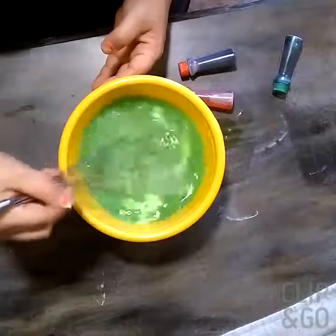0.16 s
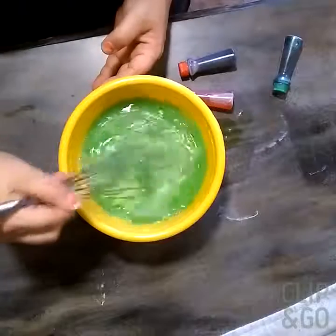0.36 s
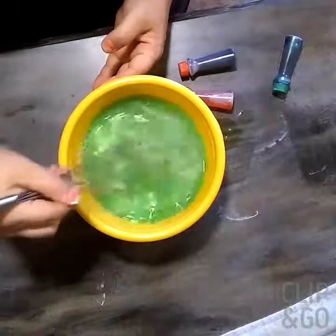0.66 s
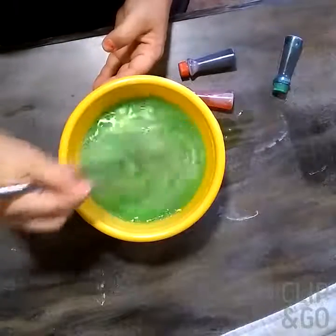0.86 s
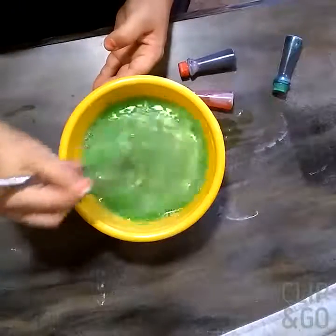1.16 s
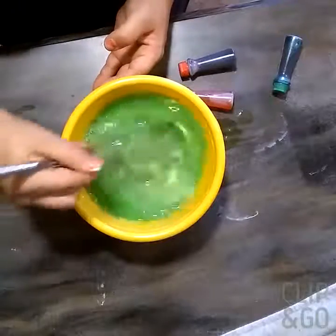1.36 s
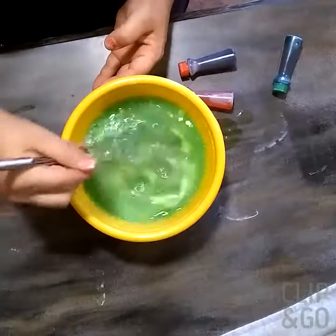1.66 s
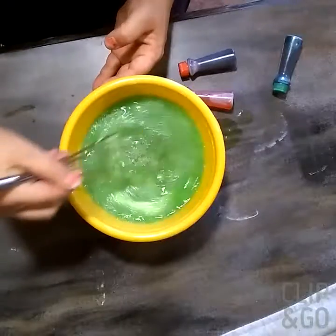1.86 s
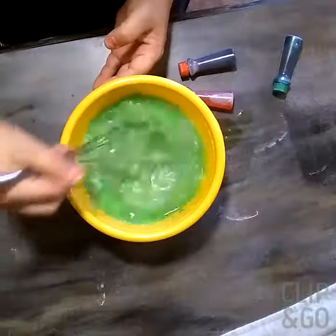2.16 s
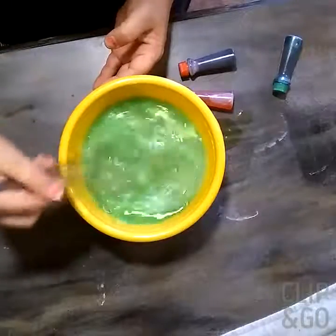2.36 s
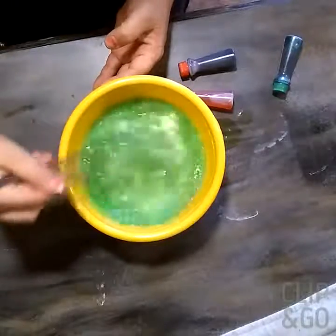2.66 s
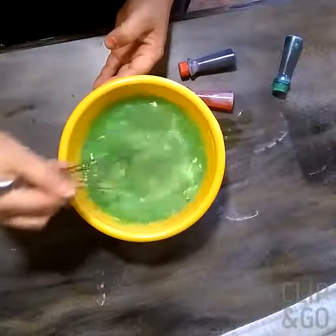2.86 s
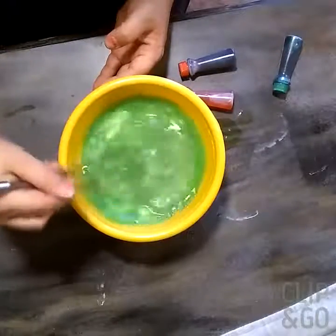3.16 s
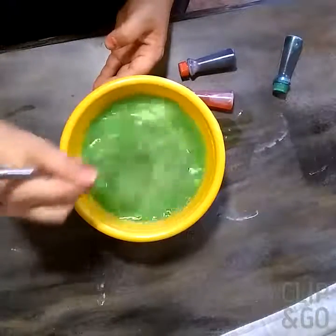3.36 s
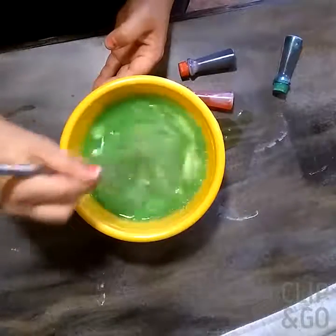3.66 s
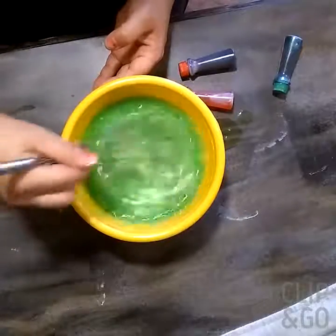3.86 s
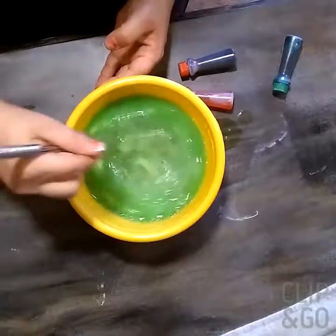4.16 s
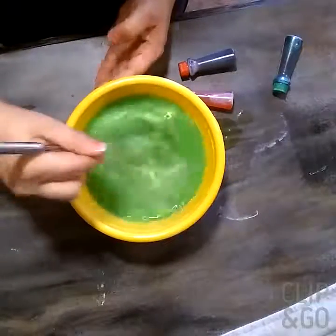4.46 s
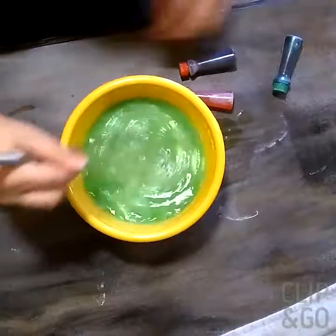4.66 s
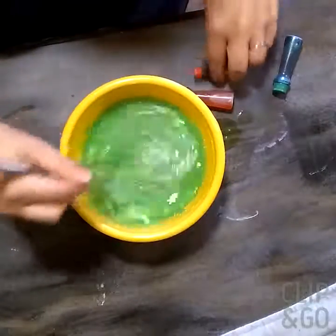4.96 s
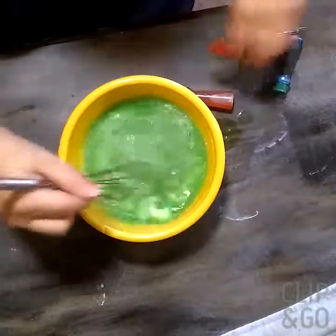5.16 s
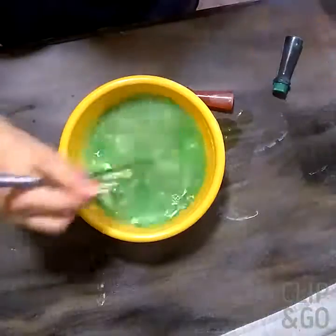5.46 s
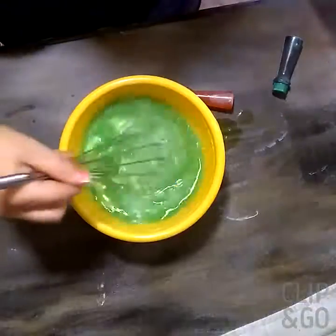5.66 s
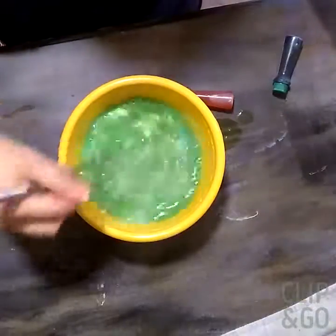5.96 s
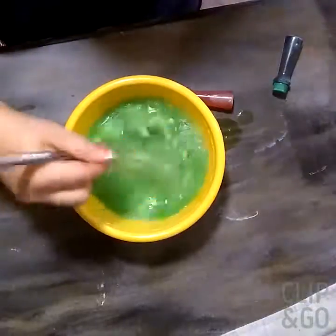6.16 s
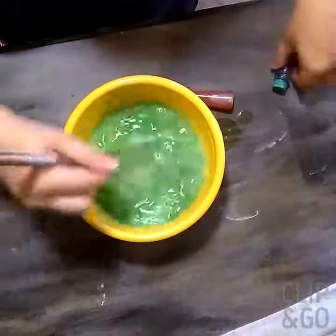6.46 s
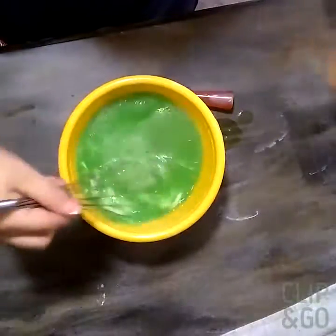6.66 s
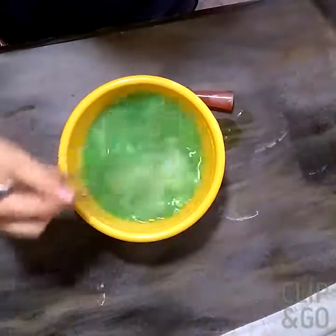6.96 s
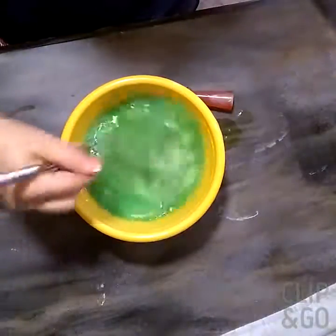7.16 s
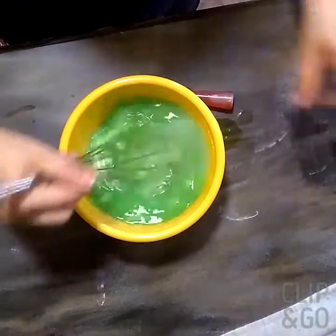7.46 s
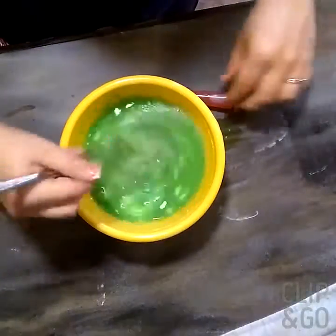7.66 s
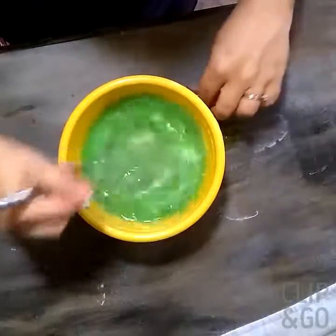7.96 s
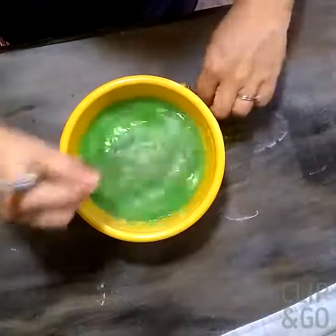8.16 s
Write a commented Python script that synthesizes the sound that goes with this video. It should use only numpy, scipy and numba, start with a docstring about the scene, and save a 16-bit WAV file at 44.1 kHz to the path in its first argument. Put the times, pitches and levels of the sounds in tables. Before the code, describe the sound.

Close, brisk whisking in a plastic bowl: wet metallic swishing and clicking, small gurgles, dull bowl knocks and low table thumps in a small room.

```python
"""Small room: a wire whisk beats thin batter in a plastic bowl on a table, close under a two-port phone.
Wires chatter, tick and tap on the wall as filtered grit, noise bursts and damped modes, and snap as pings;
knocks ring the bowl's modes, the table thumps in damped sines and rumbles in low grit; batter sloshes as
filtered grit, with bubbles and droplets as rising tones; a noise-tail room and a faint hush surround it."""
import sys
import numpy as np
from scipy import signal
from scipy.fft import rfft, irfft, next_fast_len
from scipy.io import wavfile
from scipy.ndimage import uniform_filter1d
from numba import njit

SR = 44100
rng = np.random.default_rng(int(sys.argv[2]) if len(sys.argv) > 2 else 0)


def output_pcm(signal):
    """Save a mono or channel-first signal as 16-bit PCM at the path in sys.argv[1].

    Samples are clipped to [-1, 1] before scaling.
    """
    pcm = np.clip(np.atleast_2d(signal).T, -1, 1) * 32767
    wavfile.write(sys.argv[1], SR, np.round(pcm).astype(np.int16))


N = 366471
SIZE = next_fast_len(N + SR)
HZ = np.maximum(np.fft.rfftfreq(SIZE, 1 / SR), 1)
TIME = np.arange(N) / SR

# Whole-bowl knocks. Each row: time in s, level in dB, most favoured pitch in Hz, hardness 0-1.
BOWL_KNOCKS = [(0.016, -36, 267, 0.34), (0.167, -30.5, 566, 0.36), (0.188, -23.5, 280, 0.5),
               (0.221, -34, 265, 0.2), (0.273, -31, 414, 0.24), (0.344, -33.5, 626, 0.8),
               (0.425, -35.5, 441, 0.64), (0.491, -37, 262, 0.06), (0.741, -34.5, 260, 0),
               (0.85, -36.5, 239, 0.1), (0.953, -34.5, 633, 0.4), (0.9887, -23, 573, 0.82),
               (0.997, -30, 273, 0), (1.131, -35, 244, 0.3), (1.232, -35.5, 236, 0.6),
               (1.293, -39, 258, 0.3), (1.39, -35.5, 199, 0.1), (1.558, -40, 363, 0.6),
               (1.636, -37, 596, 0.5), (1.679, -34, 245, 0.54), (1.827, -28, 608, 0.2),
               (1.84, -19, 279, 0.34), (2.051, -39, 619, 0.86), (2.0926, -23, 282, 0.64),
               (2.214, -39, 237, 0.4), (2.331, -32, 660, 0.28), (2.629, -41, 205, 0.1),
               (2.733, -32, 233, 0.16), (2.907, -32, 249, 0.57), (3.082, -44, 620, 0.4),
               (3.215, -36, 256, 0.34), (3.26, -34, 380, 0), (3.42, -34.5, 228, 0.6),
               (3.837, -35, 243, 0.5), (4.0077, -25, 640, 0.28), (4.126, -34, 285, 0.3),
               (4.576, -26, 237, 0.09), (4.597, -36.5, 239, 0), (4.791, -35.5, 202, 0.1),
               (4.998, -23.5, 520, 0.36), (5.018, -29, 272, 0.12), (5.552, -34, 199, 0.6),
               (5.5993, -21.5, 404, 0.63), (5.605, -15, 249, 0.18), (6.47, -35.5, 270, 0.2),
               (6.784, -31, 276, 0.2), (6.803, -31.5, 500, 0.3), (6.82, -36, 300, .15),
               (6.9485, -15.5, 249, 0.39), (7.025, -35, 300, 0), (7.06, -39.5, 270, .1),
               (7.367, -35, 170, 0.1), (7.477, -39, 275, 0), (7.525, -31.5, 385, 0.35),
               (7.575, -36.5, 369, 0.56), (7.787, -25.5, 590, 0.35), (7.793, -24, 343, 0),
               (8.008, -18.5, 544, 0.17), (8.209, -22, 560, 0.57)]
# Table thumps. Each row: time in s, level in dB, pitch in Hz, t60 in s.
TABLE_THUMPS = [(0.27, -41, 108, 0.3), (2.718, -36.5, 115, 0.22), (4.562, -39, 127.4, 0.28),
                (5.204, -40.5, 111, 0.17), (5.52, -34, 77.6, 0.2), (6.158, -43, 77, 0.29),
                (6.235, -45, 79, 0.29), (6.468, -26, 79, 0.29), (6.534, -33.5, 88.6, 0.45),
                (6.775, -30, 129, 0.12), (7.072, -38, 109, 0.18), (7.365, -31, 100.5, 0.25),
                (7.4, -31.5, 94.3, 0.28), (7.68, -39, 62.4, 0.56), (7.966, -38, 62, 0.22),
                (8.258, -29.5, 88, 0.31)]
# Modes of the bowl's upper wall. Each row: nominal pitch in Hz, relative level in dB, nominal t60 in s.
WALL_MODES = [(713, -12, 0.042), (792, 0, 0.085), (927, 2, 0.041), (1127, -5, 0.11), (1260, -18, 0.19),
              (1394, -8.5, 0.082), (1653, -1, 0.057), (1776, -0.5, 0.021), (2082, 0, 0.033),
              (3370, -35, 0.021), (3790, -5, 0.032)]
# Modes of the filled bowl on the table. Each row: nominal pitch in Hz, relative level in dB, nominal t60 in s.
BELLY_MODES = [(168.4, -3, 0.162), (207.3, -1.5, 0.16), (259.4, -4, 0.16), (284, 2.5, 0.073),
               (363.4, -6, 0.14), (442, -2.5, 0.12), (498, -8, 0.15), (577, 4.5, 0.048), (639, 2.5, 0.093),
               (804, -1, 0.08), (884, -8.5, 0.22), (1080, -15, 0.079)]
# Colour of a wire contact. Each row: frequency in Hz, relative gain in dB.
CONTACT_COLOUR = [(1200, -17.5), (1800, -10), (2300, -15), (2800, -6), (3300, -5), (3950, -11.5),
                  (4650, -3), (5800, -11), (7000, -9), (7700, -11.5), (8700, -8), (10800, -13.5),
                  (12000, -14.5), (13200, -16.5), (15500, -22.5)]
# Steady stirring. Each row: time in s, then levels in dB of wall rub, slosh and table rumble.
STIRRING = [(0, -46.5, -47, -45), (.45, -40.5, -69, -63.5), (.8, -46.5, -46, -51), (1.3, -41.5, -54, -55),
            (1.7, -41, -48, -51.5), (2.25, -40.5, -48.5, -56.5), (2.55, -52, -55, -50),
            (2.9, -46.5, -43, -52), (3.3, -49, -60, -49), (3.7, -60, -54.5, -53.5), (4.15, -48, -51.5, -46),
            (4.7, -68, -52, -56), (5.2, -63.5, -54.5, -48), (6.1, -52, -51.5, -50), (6.55, -65, -46.5, -53),
            (6.73, -56, -48.5, -46), (7.05, -60, -44.5, -47), (7.17, -67, -50, -56), (7.4, -48, -46.5, -50),
            (8.31, -44.5, -42.5, -54)]

BLOW_SCATTER_DB = 2.0
DETUNE = .025  # moving batter and place of the blow shift each mode by this share (spread)


def undb(db):
    """Decibels to gain."""
    return 10 ** (np.asarray(db) / 20)


def unit(x):
    """Scale to rms 1."""
    return x / np.sqrt(np.mean(x ** 2))


def together(levels_db):
    """Sum of powers, in dB."""
    return 10 * np.log10(np.sum(undb(levels_db) ** 2, axis=0))


def across(table):
    """Read (Hz, value) points at every frequency, on a log axis."""
    hz, value = np.transpose(table)
    return np.interp(np.log(HZ), np.log(hz), value)


def along(table):
    """Read every column of a time curve at every sample."""
    s, *columns = np.transpose(table)
    return [np.interp(TIME, s, column) for column in columns]


def walk(rate_hz):
    """Random levels, held 1 / rate_hz s and slewed twice; rms 1."""
    hold = int(SR / rate_hz)
    steps = np.repeat(rng.standard_normal(N // hold + 1), hold)
    return unit(uniform_filter1d(uniform_filter1d(steps, hold), hold)[:N])


def grit(rate_hz, spread_db):
    """Random contacts, rate_hz a second, most small and a few large; rms 1."""
    hit = rng.random(N) < rate_hz / SR
    force = rng.standard_normal(N) * undb(spread_db * rng.exponential(size=N))
    return unit(hit * force)


def band(x, hz, octaves):
    """Band-pass around hz."""
    edges_hz = np.clip(hz * 2 ** np.array([-octaves / 2, octaves / 2]), 20, .45 * SR)
    return signal.sosfilt(signal.butter(2, edges_hz, "bandpass", fs=SR, output="sos"), x)


def between(x, low_hz, high_hz):
    """Steep band-pass."""
    return signal.sosfilt(signal.butter(3, [low_hz, high_hz], "bandpass", fs=SR, output="sos"), x)


def colour(x, table):
    """Causal minimum-phase filter with the table's gain, scaled to pass white noise at the same rms."""
    hz, db = np.transpose(table)
    grid_hz = np.linspace(1, SR / 2, 2049)
    log_gain = np.interp(np.log(grid_hz), np.log(hz), db) * np.log(10) / 20
    cepstrum = irfft(log_gain)
    cepstrum[1:2048] *= 2  # fold onto positive time
    cepstrum[2049:] = 0
    kernel = irfft(np.exp(rfft(cepstrum)))
    return signal.fftconvolve(x, kernel / np.sqrt(np.sum(kernel ** 2)))[:N]


def ring(x, hz, t60_s):
    """One damped mode driven by x."""
    p = np.exp(2j * np.pi * hz / SR - np.log(1000) / (t60_s * SR))
    return signal.lfilter([0, p.imag], [1, -2 * p.real, abs(p) ** 2], x)


@njit
def grains(start, size, hz, glide, t60, attack):
    """Short damped tones that may glide up, each with a quick swell."""
    out = np.zeros(N + SR)
    for k in range(len(start)):
        z = size[k] + 0j
        p = np.exp(2j * np.pi * hz[k] / SR - np.log(1000) / (t60[k] * SR))
        turn = np.exp(4j * np.pi * hz[k] * glide[k] / SR ** 2)
        gap, close = 1., np.exp(-1 / (attack[k] * SR))
        for i in range(start[k], start[k] + min(int(t60[k] * SR), SR)):
            out[i] += z.imag * (1 - gap)
            z, p, gap = z * p, p * turn, gap * close
    return out[:N]


def blips(s, db, hz, glide, t60_s, attack_s=0.00054):
    """Short damped tones; a positive glide raises the pitch, as of an air pocket nearing the surface."""
    start = (s * SR).astype(np.int64)
    return grains(start, undb(db), hz, glide, t60_s, np.full(len(s), attack_s))


def strike(s, size, modes, scatter_db, near_hz=None, favour_db=0., swell_turns=.01):
    """Blows land at different spots: each shares its force anew and finds the modes a little shifted."""
    hz, db, t60_s = np.transpose(modes)
    share, shift, damp = rng.standard_normal((3, len(s), len(modes)))
    favour = 0
    if near_hz is not None:
        favour = favour_db * np.exp(-(np.log2(hz / near_hz[:, None]) / 0.24) ** 2)
    sign = (-1) ** np.arange(len(modes))
    gain = size[:, None] * undb(db + favour + scatter_db * share) * sign
    start = np.repeat(np.clip((s * SR).astype(np.int64), 0, N - 1), len(modes))
    mode_hz = (hz * (1 + DETUNE * shift)).ravel()
    mode_t60_s = (t60_s * undb(1.9 * damp)).ravel()
    attack_s = np.tile(swell_turns / hz, len(s))
    return grains(start, gain.ravel(), mode_hz, np.zeros(len(start)), mode_t60_s, attack_s)


def faint(level_db, low_hz, high_hz, count):
    """Random rows (s, dB, Hz) that follow a level curve."""
    when, loud, size = rng.random((count, 3)).T
    s = when * TIME[-1]
    db = np.interp(s, TIME, level_db) + 3.4 * (loud - 1)
    return np.transpose([s, db, low_hz * (high_hz / low_hz) ** size])


def dying(table, offset_db, t60_s):
    """A level in dB that jumps at each event of the table and dies away."""
    s, db = np.transpose(table)[:2]
    push = np.zeros(N)
    np.add.at(push, (s * SR).astype(int), undb(db + offset_db))
    return 20 * np.log10(signal.lfilter([1], [1, -undb(-60 / (t60_s * SR))], push) + 1e-9)


def strokes():
    """Each stroke swells, holds and fades; brightness is the power-weighted mean of what sounds."""
    # Each row: start of the hold in s, hold in s, chatter level in dB, brightness in dB per octave.
    stroke_rows = [(0.025, 0.0036, -37, 0.5), (0.18, 0.031, -37, -4), (0.302, 0.05, -38.5, 1),
                   (0.439, 0.029, -37, -5), (0.525, 0.098, -52, 0), (0.68, 0.053, -39.5, -3),
                   (0.87, 0.036, -39.5, -2.5), (0.962, 0.046, -31.5, -2), (1.087, 0.13, -42.5, -0.2),
                   (1.24, 0.062, -32.5, -3), (1.395, 0.001, -47.5, -14), (1.497, 0.095, -39.5, -4.5),
                   (1.643, 0.052, -40.5, -4), (1.724, 0.081, -43.5, -8.5), (1.849, 0.0025, -31, -4.5),
                   (1.943, 0.068, -39.5, -2.5), (2.045, 0.068, -34.5, -3), (2.25, 0.052, -37.5, -0.5),
                   (2.374, 0.018, -35, -2.5), (2.53, 0.044, -39.5, 1.5), (2.659, 0.071, -39, -3),
                   (2.81, 0.047, -38, 4.5), (2.915, 0.024, -36.5, -1.5), (3.068, 0.035, -38.5, 4.5),
                   (3.221, 0.014, -34, -0.7), (3.359, 0.062, -42, 4.5), (3.496, 0.04, -46.5, 4.5),
                   (3.662, 0.079, -46.5, 0), (3.807, 0.031, -50, 5), (3.928, 0.054, -48.5, 5),
                   (4.011, 0.018, -40.5, -3), (4.074, 0.028, -46, 6.5), (4.146, 0.001, -38.5, 0),
                   (4.244, 0.022, -40, 1.5), (4.32, 0.12, -47, -0.5), (4.535, 0.026, -35.5, 4),
                   (4.67, 0.054, -44, -1), (4.82, 0.036, -41.5, 2), (5.035, 0.029, -50.5, -1.5),
                   (5.323, 0.019, -46, 3.5), (5.46, 0.018, -38.5, 0.5), (5.671, 0.016, -46, -2),
                   (5.77, 0.029, -49, 6.5), (5.898, 0.014, -43, 1.5), (5.99, 0.055, -39, 0),
                   (6.178, 0.014, -43, 2.5), (6.255, 0.055, -53, -1), (6.31, 0.098, -46, 4.5),
                   (6.524, 0.06, -41.5, 2), (6.633, 0.004, -39, -0.5), (7.329, 0.002, -33.5, 2),
                   (7.427, 0.038, -45.5, 3), (7.551, 0.0061, -32, 1), (7.64, 0.061, -45.5, 2.5),
                   (7.772, 0.012, -31.5, 0.5), (7.876, 0.006, -38, -0.5), (8, 0.002, -30.5, -1),
                   (8.11, 0.034, -47, 2), (8.213, 0.054, -40.5, -7)]
    # Chatter between strokes. Each row: time in s, level in dB, brightness in dB per octave.
    lull_rows = [(0, -45, 0), (1.4, -50.5, 6), (2.8, -48, 5.5), (4.15, -69, 2), (5.1, -62.5, 5.5),
                 (5.9, -59, -1), (6.9, -63, 0.5), (8.31, -50.5, -3)]
    rise_db_per_s, fall_db_per_s = 493, 312
    lull_db, lull_tilt_db = along(lull_rows)
    power = undb(lull_db) ** 2
    tilt = power * lull_tilt_db
    for s, hold_s, db, tilt_db in stroke_rows:
        near = slice(max(int((s - .3) * SR), 0), int((s + .5) * SR))
        late_s = TIME[near] - s
        slope_db = np.maximum(-late_s * rise_db_per_s, (late_s - hold_s) * fall_db_per_s)
        swell = undb(db - np.maximum(0, slope_db)) ** 2
        power[near] += swell
        tilt[near] += swell * tilt_db
    return 10 * np.log10(power), tilt / power


def hush():
    """Room hush: steady coloured noise."""
    # Each row: frequency in Hz, relative gain in dB.
    hush_colour = [(24, -49), (45, -38), (106, 0.5), (241, 7), (309, -6), (1680, -14.5), (2510, -17.5),
                   (3300, -12.5), (5000, -30), (7710, -32), (8730, -21.5), (15500, -29)]
    return undb(-51) * colour(rng.standard_normal(N), hush_colour)


def tail(t60_s):
    """A burst of fading reflections with unit energy."""
    t = np.arange(int(t60_s * SR)) / SR
    echoes = rng.standard_normal(len(t)) * undb(-60 * t / t60_s)
    return echoes / np.sqrt(np.sum(echoes ** 2))


def reverb(x):
    """The small room answers after a short gap."""
    gap_s, t60_s, room_db = .006, 0.29, -10.5
    echoes = np.r_[np.zeros(int(gap_s * SR)), tail(t60_s)]
    return undb(room_db) * signal.fftconvolve(x, echoes)[:N]


def shaking():
    """Rumble level: stirring that wavers, and a dying shake after every knock and thump."""
    waver_db, knock_shake_db, thump_shake_db, shake_t60_s = 3, -26.5, -5.5, 0.38
    return together([along(STIRRING)[2] + waver_db * walk(15),
                     dying(BOWL_KNOCKS, knock_shake_db, shake_t60_s),
                     dying(TABLE_THUMPS, thump_shake_db, shake_t60_s)])


def rumble():
    """The rocking bowl rumbles through the table, which shakes the ports partly against each other."""
    # Each row: frequency in Hz, relative gain in dB.
    rumble_colour = [(20, -75), (40, -37), (60, -19.5), (90, -2.5), (130, -2), (180, -13.5), (300, -49)]
    opposed = .2  # share of power that reaches the ports in opposite sign
    shake = undb(shaking())
    common, left, right = (colour(grit(300, 0.77) * shake, rumble_colour) for _ in range(3))
    against = np.sqrt(opposed) * np.array([common, -common])
    separate = np.sqrt(1 - opposed) * np.array([left, right])
    return undb(-6.0) * (against + separate)


def thumps():
    """The table top swings after each jolt, two of its shapes at once; the ports feel it out of step."""
    attack_s, mean_lag_rad, lag_spread_rad = 0.005, 1.7, 0.7
    out, t = np.zeros((2, N + SR)), np.arange(SR // 2) / SR
    lag = mean_lag_rad + lag_spread_rad * rng.standard_normal((len(TABLE_THUMPS), 2, 1, 1))
    phases = np.array([[0], [-1]]) * lag  # thump, shape, port, time
    for (s, db, hz, t60_s), (first, second) in zip(TABLE_THUMPS, phases):
        start = int(s * SR)
        shape = undb(db + 2.0 - 60 * t / t60_s) * (1 - np.exp(-t / attack_s))
        swing = np.sin(2 * np.pi * hz * t + first)
        swing = swing + 0.33 * np.sin(2 * np.pi * 1.394 * hz * t + second)
        out[:, start:start + len(t)] += shape * swing
    return out[:, :N]


def gurgle(rub_db, count=1500):
    """Bubbles beaten into the batter ring and rise in pitch; small ones are higher and shorter."""
    when, size, loud, rise = rng.random((count, 4)).T
    s, hz = when * TIME[-1], 220 * 2 ** (3.163 * size)
    db = np.interp(s, TIME, rub_db) - 4.01 * np.log(1 - loud) - 7.5
    return between(blips(s, db, hz, 10 * rise, np.clip(30 / hz, .005, .08)), 150, 4800)


def batter():
    """Batter slaps wall and belly of the bowl in soft lumps, gurgles, and washes on after each knock."""
    # Each row: frequency in Hz, relative gain in dB.
    slosh_colour = [(100, -30.5), (170, 2), (260, 4), (400, 3.5), (600, -5), (1000, -16.5), (2000, -28)]
    stroke_share = 0.44  # share of the stroke's swell, in dB, that the wall rub follows
    wash_db, wash_t60_s = -17.5, 0.36
    rub_db, slosh_db = along(STIRRING)[:2]
    stroke_db = strokes()[0]
    rub_db = rub_db + stroke_share * (stroke_db - uniform_filter1d(stroke_db, SR // 3))
    slosh_db = together([slosh_db, dying(BOWL_KNOCKS, wash_db, wash_t60_s)])
    # rubbing halves the wall's t60
    wall = sum(undb(db) * ring(grit(1500, 3.1) * undb(rub_db), hz, 0.5 * t60_s)
               for hz, db, t60_s in WALL_MODES)
    lumps = grit(900, 2.1) * undb(slosh_db)
    belly = sum(undb(db) * ring(lumps, hz, t60_s) for hz, db, t60_s in BELLY_MODES)
    slosh = undb(-4.0) * colour(lumps, slosh_colour)
    return gurgle(rub_db) + undb(-31.0) * wall + slosh + undb(-40.5) * belly


def droplets(count=2500):
    """Spray flung off the wires: tiny bright rising blips, louder on strong strokes."""
    when, size, loud, rise = rng.random((count, 4)).T
    s, hz = when * TIME[-1], 2800 * 2 ** (1.9 * size)
    db = np.interp(s, TIME, strokes()[0]) - 4.14 * np.log(1 - loud) - 9
    return blips(s, db, hz, 12 * rise, np.clip(60 / hz, .003, .05))


def knocks():
    """A soft blow reaches only low modes, a hard one more of them behind a firm front; the bowl bounces once."""
    lead_s, front_late_s, bounce_late_s = 0.00052, 0.00147, 0.00783  # first touch leads the listed time
    front_db, front_hz, front_t60_s = 6.5, 611, 0.012
    swell_turns = 1.5  # build-up time constant, in cycles of each mode
    s, db, hz, hard = np.transpose(BOWL_KNOCKS)
    s, hard = s - lead_s, np.clip(hard, .01, 1)

    def blow(at_s, size, favour_db):
        return strike(at_s, size, BELLY_MODES, BLOW_SCATTER_DB, hz, favour_db, swell_turns)

    sharp = blow(s, hard * undb(db - 8.5), 9.3)
    dull = blow(s, (1 - hard) * undb(db - 9.0), 10.6)
    bounce = blow(s + bounce_late_s, undb(db - 18.0), 6.5)
    front = blips(s + front_late_s, db + front_db + 10 * np.log10(hard),
                  front_hz + 0 * s, 0 * s, front_t60_s + 0 * s)
    return between(front, 180, 2500) + between(sharp, 186, 1070) + between(dull + bounce, 141, 540)


def taps():
    """Each tap cracks, rings the wall and squeezes an air pocket in the batter."""
    # Each row: time in s, level in dB, pocket pitch in Hz, pocket share 0-1.
    tap_rows = [(.153, -31, 660, 0.8), (.169, -29, 720, 0.5), (.186, -19.5, 1390, 0.48),
                (.346, -27.5, 760, 0.14), (.428, -35, 960, 0.2), (0.487, -38, 910, 0.8),
                (0.609, -36, 850, 0.27), (.701, -35.5, 900, 0.4), (.842, -35, 780, 0.7),
                (.874, -33, 799, 0.26), (.933, -30, 830, 0.7), (.99, -23.5, 1210, 0.3),
                (1.123, -40, 790, 0.2), (1.161, -27, 814, 0.5), (1.239, -33.5, 880, 0.3),
                (1.297, -34, 980, 0.6), (1.503, -36.5, 1660, 0.7), (1.68, -24.5, 1790, 0.1),
                (1.694, -29, 1490, 0.4), (1.776, -33, 1460, .93), (1.824, -32, 1540, 0.8),
                (1.842, -20, 1136, 0.57), (2.049, -30, 1550, 0.03), (2.094, -22, 1127, 0.65),
                (2.227, -34, 766, 0), (2.341, -33, 980, 0.4), (2.37, -31, 2120, 0.8),
                (2.548, -30.5, 810, 0.16), (2.577, -28.5, 1287, 0.96), (2.658, -34.5, 1780, 1),
                (2.721, -32, 940, 0.16), (2.852, -30, 730, 0.55), (2.864, -25.5, 1090, 0.26),
                (2.92, -25.5, 1070, 0.26), (3.083, -22, 770, 0.24), (3.207, -34, 1060, 0.5),
                (3.224, -24.5, 840, 0.45), (3.404, -32, 840, 0.04), (3.421, -23.5, 870, 0.34),
                (3.437, -27, 1030, 0.26), (3.713, -37, 1120, 0.02), (3.836, -29.5, 865, 0.6),
                (3.931, -26.5, 795, 0.5), (4.013, -21, 873, 0.6), (4.127, -28.5, 1160, 0),
                (4.241, -32, 1960, 0.8), (4.395, -31, 764, 0.4), (4.574, -34.5, 820, 0.33),
                (4.641, -39, 1010, 0.3), (5.045, -37.5, 795, 0.86), (5.341, -32.5, 2017, 1),
                (5.544, -29.5, 810, 0.68), (5.599, -21, 840, 0.9), (5.892, -42.5, 1680, 0.3),
                (6.782, -43, 825, 0.45), (6.81, -36.5, 1160, 0.27), (6.951, -34, 770, 0.6),
                (7.2106, -26.5, 1190, 0.53), (7.269, -28, 825, 0.67), (7.524, -33, 825, 0.6),
                (7.548, -29, 855, 0.7), (7.773, -35, 795, 0.9), (7.788, -26, 915, 0.5),
                (8.011, -21, 954, 0.7), (8.211, -22.5, 1160, 0.52), (8.255, -23.5, 860, 0.5)]
    crack_db, crack_t60_s = -1, .007
    soft = faint(along(STIRRING)[0] + 4, 660, 1730, count=20)  # 4 dB above the rub at most
    s, db, hz, pocket = np.vstack([np.c_[soft, np.full(len(soft), .55)], tap_rows]).T
    pocket, same = np.clip(pocket, .01, 1), np.ones(len(s))
    wall = strike(s, (1 - pocket) * undb(db - 7.0), WALL_MODES, BLOW_SCATTER_DB, hz, 6.4)
    crack = blips(s, db + crack_db, hz, 0 * s, crack_t60_s * same)
    pop = blips(s, db + 2.5 + 20 * np.log10(pocket), hz, 0.67 * same, 0.037 * same)
    return between(crack + pop, 290, 6400) + between(wall, 645, 6400)


def snaps():
    """Two wires snap against each other: a dry, bright, brief ping."""
    # Each row: time in s, level in dB, pitch in Hz.
    snap_rows = [(1.841, -16, 6500), (2.658, -43, 9100), (3.419, -32, 8930), (4.0116, -17.5, 9200),
                 (4.127, -38, 8700), (4.8274, -35, 8950), (5.341, -8, 7100), (7.788, -29, 9350),
                 (8.0104, -16, 6650)]
    s, db, hz = np.transpose(snap_rows)
    return blips(s, db, hz, 0 * s, 0.0043 + 0 * s, attack_s=0.00018)


def ticks():
    """Each wire contact is a click, a snap and a short burst strongest near its pitch; the wires ring behind."""
    # Each row: time in s, level in dB, loudest pitch in Hz.
    tick_rows = [(0.021, -38, 8950), (.0692, -33.5, 4650), (0.1859, -28.5, 3800), (0.2906, -39, 4100),
                 (0.4296, -30, 3280), (0.456, -32, 3300), (0.7134, -34, 3300), (0.869, -30, 4760),
                 (0.952, -29.5, 3480), (0.978, -29, 3230), (0.989, -27, 3470), (1.0865, -38, 8640),
                 (1.205, -30.5, 3570), (1.2352, -35, 4550), (1.26, -26.5, 4200), (1.3889, -27.5, 3720),
                 (1.677, -29, 3170), (1.73, -30.5, 4630), (1.841, -27, 6140), (1.9633, -28.5, 4060),
                 (2.0023, -38, 8550), (2.047, -37, 4630), (2.0664, -27.5, 6800), (2.0928, -29.5, 3550),
                 (2.348, -33.5, 9250), (2.369, -33, 4040), (2.4954, -35.5, 8600), (2.54, -34, 8800),
                 (2.659, -29, 3080), (2.7253, -31, 2760), (2.8499, -25.5, 2990), (2.916, -30, 3040),
                 (3.0796, -32.5, 3800), (3.213, -30, 2830), (3.401, -28.5, 3180), (3.4201, -22.5, 3310),
                 (3.8364, -34, 8950), (4.0107, -23.5, 3540), (4.1261, -21.5, 8650), (4.153, -44, 8850),
                 (4.238, -32, 4100), (4.3708, -33, 3120), (4.4074, -29, 3000), (4.5135, -30, 6700),
                 (4.527, -35, 6000), (4.555, -33, 3500), (4.803, -34, 3360), (4.827, -30, 9300),
                 (4.8617, -33, 4660), (4.894, -37, 7400), (5, -46.5, 9300), (5.341, -36, 6850),
                 (5.452, -33, 8600), (5.4808, -33, 6700), (5.5427, -39.5, 3700), (5.597, -42, 8500),
                 (5.6455, -34, 3100), (5.6737, -30.5, 4870), (5.893, -41, 9000), (5.9836, -33, 3240),
                 (6.067, -34, 3650), (6.171, -39.5, 8700), (6.1903, -30.5, 3540), (6.25, -36, 3500),
                 (6.314, -52, 8400), (6.388, -36, 6530), (6.5316, -37.5, 8700), (6.581, -35, 3500),
                 (6.638, -38.5, 6000), (6.792, -44, 5200), (7.026, -41, 8700), (7.034, -41, 8600),
                 (7.31, -40, 4400), (7.32, -40, 4800), (7.424, -42, 3540), (7.543, -34, 3460),
                 (7.5661, -22.5, 3370), (7.6916, -42, 9000), (7.7405, -32, 3180), (7.775, -28, 9200),
                 (7.788, -16, 3220), (7.874, -28.5, 2800), (7.9982, -25.5, 9800), (8.012, -18.5, 3160),
                 (8.2012, -36, 8850), (8.2099, -23, 7000)]
    # Modes of the thin wires. Each row: nominal pitch in Hz, relative level in dB, nominal t60 in s.
    wire_modes = [(4566, 0.5, 0.041), (5550, -8.5, 0.023), (6540, -37, 0.043), (8580, 5, 0.012),
                  (9760, -36, .04)]
    burst_t60_s, burst_attack_s = 0.033, 0.0022
    snap_t60_s, snap_attack_s, snap_db, click_db = 0.005, 0.0001, 2, 9
    soft = faint(strokes()[0] - 2, 3500, 9900, count=30)  # at least 2 dB below the chatter level
    rows = np.vstack([soft, tick_rows])
    t = np.arange(SR // 10) / SR
    noises = rng.standard_normal((len(rows), len(t)))
    broad, pitched = np.zeros((2, N + SR))
    shape = undb(-60 * t / burst_t60_s) * (1 - np.exp(-t / burst_attack_s))
    snap = undb(snap_db - 60 * t / snap_t60_s) * np.minimum(t / snap_attack_s, 1)
    for (s, db, hz), noise in zip(rows, noises):
        burst, start = noise * undb(db), int(s * SR)
        span = slice(start, start + len(t))
        broad[start] += undb(db + click_db)
        broad[span] += burst * (shape + 0.91 * snap)
        pitched[span] += band(burst * (shape + snap), hz, 0.25)
    s, db = rows.T[:2]
    wires = strike(s, undb(db - 13.5), wire_modes, 0.95)
    return undb(-2.0) * colour(broad[:N], CONTACT_COLOUR) + undb(9.0) * pitched[:N] + wires


def chatter():
    """Wet wires swish along the wall: droplets and contacts of every size, each size swelling in its own time."""
    clump_db, flicker_db = 2, 2.4  # swell shared by all sizes; own swell of each size
    spray_spread_db, contact_spread_db = 2.7, 2.4
    chatter_db, tilt_db = strokes()
    chatter_db = chatter_db + clump_db * walk(120)
    out, contacts = np.zeros(N), grit(700, contact_spread_db)
    for hz in 1500 * 2 ** np.arange(0, 3.6, .5):
        swell_db = chatter_db + tilt_db * np.log2(hz / 5000) + flicker_db * walk(30)
        spray = grit(9000, spray_spread_db)
        out += undb(swell_db) * band(spray + 0.85 * contacts, hz, 0.62)
    return undb(-5.0) * colour(out, CONTACT_COLOUR)


def ports(wash, blows):
    """The left port hears first and brighter; part of the sound reaches the right by scattered paths."""
    # Each row: frequency in Hz, left minus right in dB.
    level_gap = [(60, 1.2), (340, 1.7), (520, 4.1), (800, 4.1), (1400, .5), (1750, 0.2), (2250, .8),
                 (2550, 1.5), (2800, 5.5), (3400, 4.2), (4600, 4), (6500, 6), (8600, 3), (11000, 10),
                 (15000, 14)]
    # Each row: frequency in Hz, lead of the left port in radians.
    phase_lead = [(0, 0), (1400, 0), (1720, .8), (1980, 2.1), (2240, 2.9), (2580, 3.2), (2760, 3.4),
                  (3450, 5.6), (7750, 15.6), (8600, 18.2), (16000, 35)]
    # Each row: frequency in Hz, unrelated share of power 0-1 for the wash.
    loose_share = [(60, 1), (125, 1), (500, 0.85), (780, 0.4), (1200, 0.049), (1850, 0.85), (2200, .04),
                   (2450, .015), (2700, .05), (3200, 0.7), (4800, 0.52), (8700, 0.65), (10500, .95),
                   (15000, 1)]
    firm = .4  # close, firm blows take only this part of the unrelated share
    share = across(loose_share)
    soft, hard = (rfft(x, SIZE) * undb(-across(level_gap)) for x in (wash, blows))
    lead_rad = np.interp(HZ, *np.transpose(phase_lead))
    direct = soft * np.sqrt(1 - share) + hard * np.sqrt(1 - share * firm)
    right = irfft(direct * np.exp(-1j * lead_rad), SIZE)[:N]
    stray = np.sqrt(share) * (soft + hard * np.sqrt(firm))
    # hands and bowl keep moving, so the scattered paths fade in and out
    weights = np.array([walk(25) for _ in range(4)])
    weights /= np.sqrt(np.sum(weights ** 2, axis=0))
    for weight in weights:
        right += weight * irfft(stray * rfft(tail(0.063), SIZE), SIZE)[:N]
    return np.array([wash + blows, right])


def scene():
    """Whisk, bowl and room through the air; table through the phone's body, stronger at the left port."""
    wash = batter() + droplets() + chatter()
    blows = knocks() + taps() + snaps() + ticks()
    airborne = ports(wash + reverb(wash + blows) + hush(), blows)
    return airborne + undb([[1.2], [-1.2]]) * (rumble() + thumps())


def record(dry):
    """The microphones lose the deepest bass; the recorder cuts the top."""
    thin = signal.sosfilt(signal.butter(2, 45, "highpass", fs=SR, output="sos"), dry)
    return signal.sosfilt(signal.ellip(10, .2, 70, 15500, fs=SR, output="sos"), thin)


dry = scene()
out = record(dry)
output_pcm(out)
```